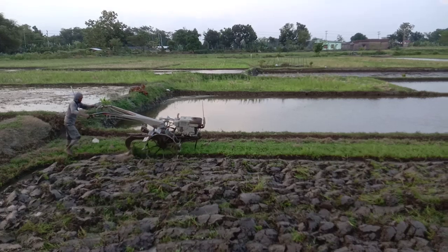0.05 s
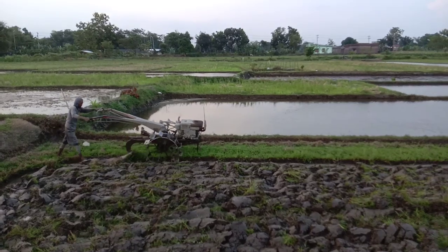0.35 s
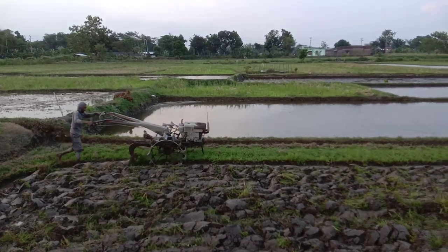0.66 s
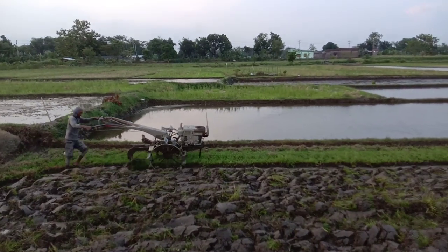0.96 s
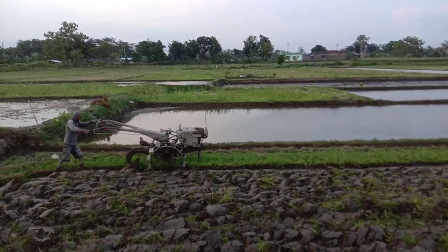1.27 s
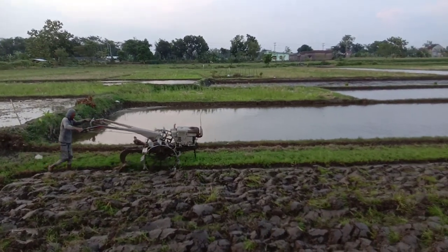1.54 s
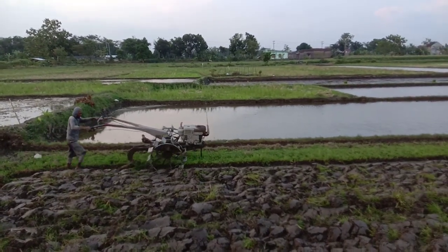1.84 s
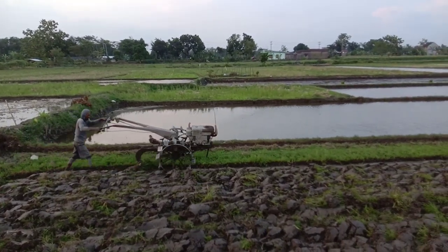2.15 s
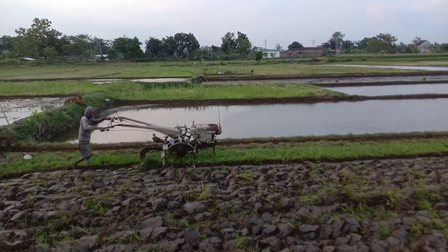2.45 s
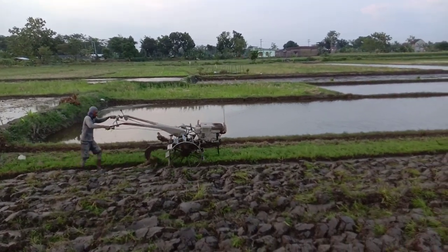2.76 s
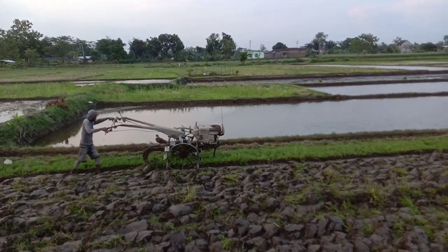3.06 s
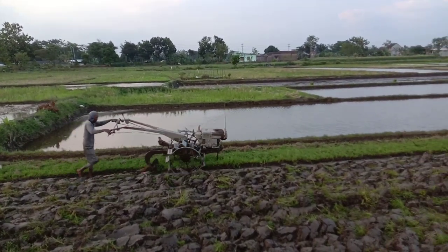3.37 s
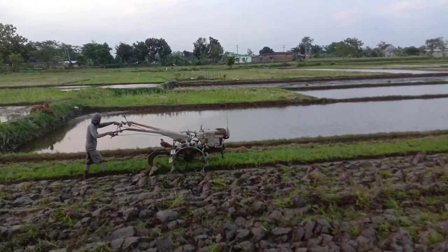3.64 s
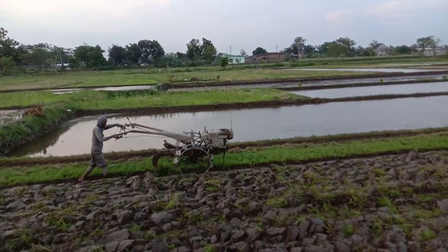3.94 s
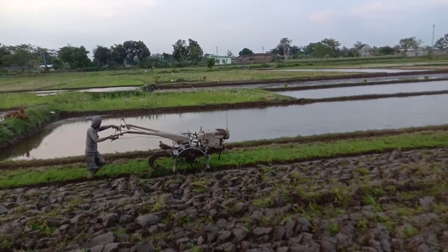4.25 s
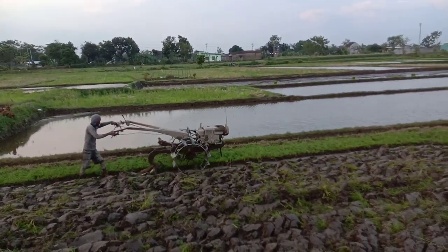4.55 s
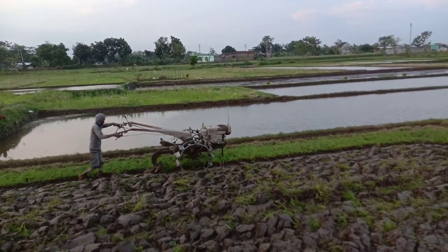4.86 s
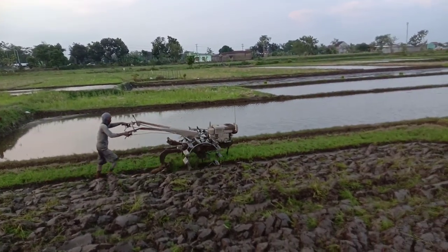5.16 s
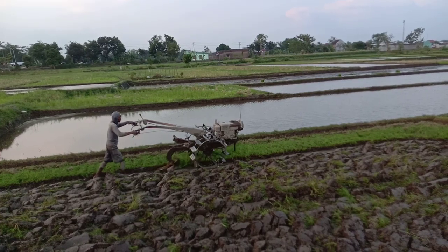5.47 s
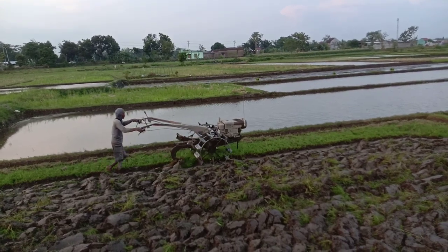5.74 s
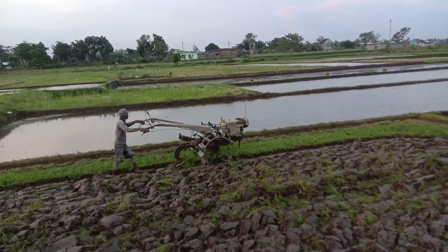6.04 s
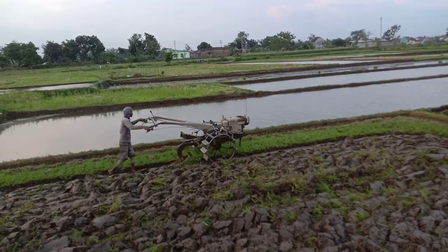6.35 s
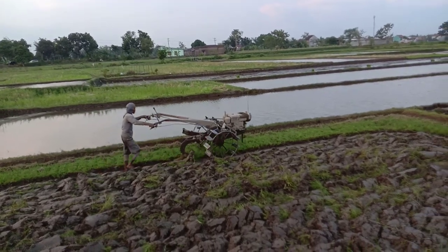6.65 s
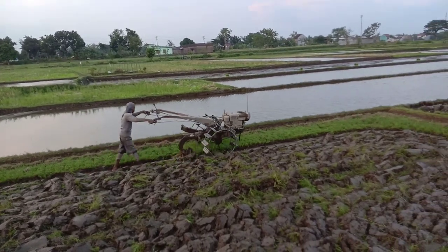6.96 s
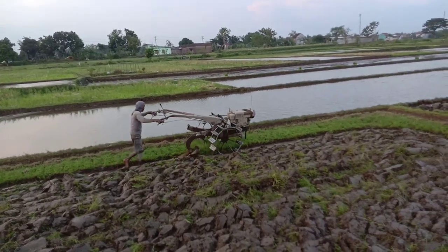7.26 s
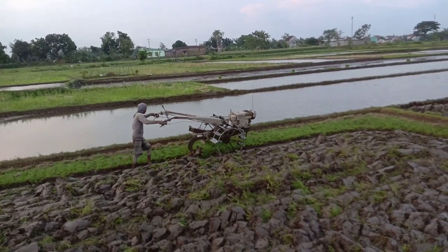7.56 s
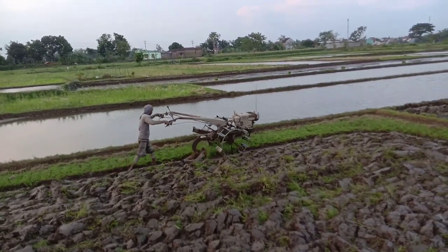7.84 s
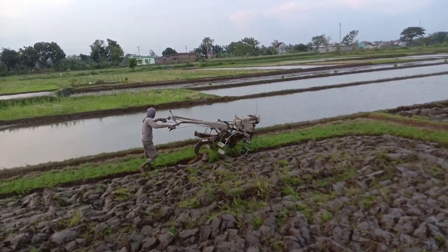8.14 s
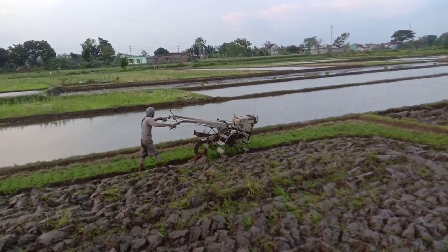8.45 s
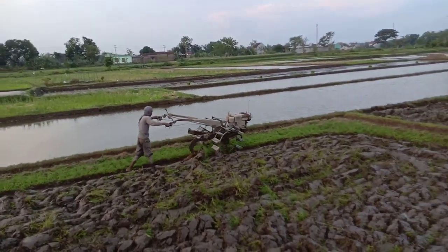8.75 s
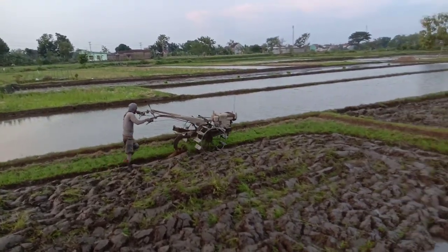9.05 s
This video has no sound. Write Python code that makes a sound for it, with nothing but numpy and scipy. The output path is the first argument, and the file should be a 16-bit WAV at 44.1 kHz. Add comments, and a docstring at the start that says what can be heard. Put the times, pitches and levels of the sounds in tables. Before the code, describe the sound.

A single-cylinder walking tractor chugs through an open field with rapid, uneven iron knocks, soft exhaust puffs and clattering gears. Loose plough fittings clink now and then, and a thin high hiss comes and goes. After about three seconds wind begins to buffet the microphone and keeps gusting, while the engine holds its pace and softens slightly as it moves away.

```python
"""A single-cylinder walking tractor ploughs past the microphone in a wet rice field and moves away.
It fires about 7.5 times a second: each firing knocks the iron block, often with a second slap, and every
other firing is weaker. A soft exhaust puff follows, gears clatter between, loose plough fittings clink.
After three seconds wind starts to buffet the microphone; a thin hiss comes and goes."""
import sys
import numpy as np
from scipy import signal
from scipy.fft import rfft, irfft, next_fast_len
from scipy.io import wavfile
from scipy.ndimage import uniform_filter1d, map_coordinates

SR = 44100
rng = np.random.default_rng(int(sys.argv[2]) if len(sys.argv) > 2 else 0)


def bounce(signal):
    """Save signal as a 16-bit WAV file at the path given by the first command-line argument."""
    frames = np.transpose(np.atleast_2d(signal))
    limited = np.clip(frames, -1, 1)
    pcm = np.round(limited * 32767).astype(np.int16)
    wavfile.write(sys.argv[1], SR, pcm)


N = 401310
TIME = np.arange(N) / SR
T = np.arange(SR // 6) / SR  # time within one blow

# spectrum of rattling and grinding metal: f/Hz, level/dB
METAL_SPECTRUM = [(150, -43), (210, -10.5), (300, -41), (400, -10.5), (540, -10.5), (630, -2), (730, -11.5),
                  (850, -5), (1080, -6), (1240, 0.5), (1420, -7.5), (1900, -14), (2300, -26.5),
                  (5000, -55.5)]


def amp(db):
    """Decibels to gain."""
    return 10 ** (np.asarray(db) / 20)


def unit(x):
    """Scale to rms 1."""
    return x / np.sqrt(np.mean(x ** 2) + 1e-20)


def curves(rows):
    """One value per sample for each column after the time."""
    times, *columns = np.transpose(rows)
    return [np.interp(TIME, times, column) for column in columns]


def bumps(rows):
    """A gain that rises and falls around each row of t/s, half length/s, level/dB."""
    return sum(amp(db) * np.exp(-((TIME - s) / half) ** 2) for s, half, db in rows)


def wobble(rate):
    """A smooth random curve, rate knots a second."""
    return map_coordinates(rng.standard_normal(int(N * rate / SR) + 4), [TIME * rate])


def burst(rise, t60):
    """An envelope that swells and dies away, top 1."""
    shape = (1 - np.exp(-(T / rise) ** 2)) * amp(-60 * T / t60)
    return shape / shape.max()


def filtered(x, response):
    """Filter x by a gain that depends on frequency."""
    size = next_fast_len(N + SR // 2)
    return irfft(rfft(x, size) * response(np.fft.rfftfreq(size, 1 / SR)), size)[:N]


def noise(spectrum, patchy_db=0, frame=512):
    """Noise of rms 1, shaped by rows of f/Hz, level/dB, with small patches of random gain."""
    f, level = np.transpose(spectrum)
    cells = signal.stft(rng.standard_normal(N), nperseg=frame)[2]
    patches = uniform_filter1d(rng.standard_normal(cells.shape), size=2, axis=0)
    patches = uniform_filter1d(patches, size=5, axis=1)
    patchy = signal.istft(cells * amp(patchy_db * unit(patches)), nperseg=frame)[1][:N]
    return unit(filtered(patchy, lambda hz: amp(np.interp(np.log(hz + 1), np.log(f), level))))


def add(track, s, sound):
    """Mix a sound into a track at time s."""
    start = max(round(s * SR), 0)
    part = track[start:start + len(sound)]
    part += sound[:len(part)]


def hiss(rest_db=-68.5):
    """A thin high hiss swells and fades in the background."""
    # swells: t/s, half length/s, level/dB
    swells = [(1.85, 0.46, -56), (3.1, 0.12, -53), (3.68, 0.42, -48), (5, 0.18, -48.5), (5.4, 0.2, -47),
              (6.35, 0.37, -58), (7.16, .06, -52)]
    # hiss spectrum: f/Hz, level/dB
    spectrum = [(3500, -45.5), (4700, 6), (5300, 10.5), (6100, 4), (6600, -12.5), (9000, -48)]
    return (amp(rest_db) + bumps(swells)) * noise(spectrum, patchy_db=2.5) * amp(1.6 * wobble(40))


def wind(ceiling=.28):
    """Light air rumbles on the microphone; stronger eddies buffet it, and hard gusts flutter higher."""
    # wind strength at the microphone: t/s, level/dB
    strength = [(2.2, -100), (2.6, -55.5), (3.2, -66), (3.26, -43.5), (3.61, -35.5), (3.7, -72),
                (3.78, -20), (4.2, -37), (4.33, -23), (5.38, -25), (5.5, -35), (5.57, -22.5), (5.9, -30),
                (6.19, -26), (6.25, -83), (6.28, -28.5), (6.98, -26), (7.07, -36), (7.42, -19),
                (8.3, -30.5), (8.65, -24.5), (9.1, -26)]
    # flutter of the hard gusts: t/s, half length/s, level/dB
    gusts = [(3.902, 0.051, -32.5), (4.52, 0.12, -33.5), (5.29, 0.038, -31.5), (5.59, 0.034, -35),
             (6.335, 0.043, -24), (6.528, 0.061, -22.5), (7.6, 0.22, -35)]
    # spectra of light air, eddies and gusts: f/Hz, level/dB
    rumble_spectrum = [(20, -28.5), (40, -29), (60, -12), (85, -0.5), (130, 2.5), (200, -7), (400, -34.5),
                       (1500, -79.5)]
    buffet_spectrum = [(20, -36), (45, -30), (65, -13), (85, -4), (115, .5), (165, 1.5), (260, -2.5),
                       (330, -7.5), (420, -13), (600, -24), (1500, -50), (4000, -80)]
    flutter_spectrum = [(150, -53.5), (300, 0.5), (400, -1.5), (600, -7.5), (900, -21.5), (1500, -28),
                        (4000, -82)]
    strength_db, = curves(strength)
    rumble = amp(np.minimum(0.78 * strength_db - 3.5, -32)) * noise(rumble_spectrum)
    buffet = amp(strength_db) * noise(buffet_spectrum, patchy_db=3, frame=2048)
    turbulence = amp(2 * wobble(24))
    flutter_gain = amp(1.23 * strength_db - 13.5) + bumps(gusts)
    flutter = flutter_gain * noise(flutter_spectrum, patchy_db=3, frame=1024)
    air = turbulence * (rumble + buffet + flutter)
    return air / (1 + (air / ceiling) ** 4) ** .25  # the strongest pushes are rounded off


def firing_times(first_s=.018):
    """The engine fires each time it completes a cycle."""
    # speed held by the governor from each time on: t/s, firing rate/Hz
    speed = [(0, 7.413), (1.37, 7.475), (3.24, 7.389), (3.65, 7.584), (4.57, 7.528), (6.16, 7.49),
             (6.7, 7.407), (8.32, 7.457)]
    times, rate = np.transpose(speed)
    cycles = np.cumsum(rate[np.searchsorted(times, TIME, side="right") - 1]) / SR
    return first_s + np.interp(np.arange(int(cycles[-1]) + 1), cycles, TIME)


def cover_ring(detune=0.019):
    """Thin covers and tank jangle, tuned a little differently at each blow."""
    # sheet-metal modes: f/Hz, t60/s, level/dB
    cover_modes = [(2150, 0.1, -7), (2500, 0.085, 1.5), (2720, 0.14, -2.5), (3103, 0.14, -7),
                   (3695, 0.094, -3), (3980, 0.052, 8), (4390, 0.051, 3.5)]
    hz, t60, level = np.transpose(cover_modes)[:, :, None]
    pitch, phase = rng.standard_normal((2, len(cover_modes), 1))
    modes = amp(level - 60 * T / t60) * np.sin(2 * np.pi * (hz * (1 + detune * pitch) * T + phase))
    ring = modes.sum(0) * (1 - np.exp(-T / 0.0021))
    return ring / np.sqrt(np.sum(ring ** 2) / (.01 * SR))  # the energy of 10 ms at rms 1


def block_ring(behind, rise, scatter_db=1.1, detune=0.012):
    """The struck iron block rings, heard from the side (behind=0) round to the rear (behind=1)."""
    # block modes: f/Hz, t60/s, side level/dB, rear level/dB
    block_modes = [(607, 0.014, -33.5, -10.5), (841, 0.064, -14.5, -4.5), (1035, 0.044, -7.5, -19.5),
                   (1206.6, 0.1, -10.5, -5), (1244.4, 0.05, 3, -5.5), (1284.5, 0.068, -8, -2),
                   (1480, 0.015, 4, -5), (1597, 0.12, -14.5, -25.5), (1924, 0.065, -15, -36.5)]
    hz, t60, side_db, rear_db = np.transpose(block_modes)[:, :, None]
    size, pitch, phase = rng.standard_normal((3, len(block_modes), 1))
    level = side_db + behind * (rear_db - side_db) + scatter_db * size
    modes = amp(level - 60 * T / t60) * np.sin(2 * np.pi * hz * (1 + detune * pitch) * T + 0.97 * phase)
    ring = modes.sum(0) * (1 - np.exp(-(T / rise) ** 2))
    return ring / np.sqrt(np.mean(ring[T < .012] ** 2))  # rms 1 over the first 12 ms


def clinks():
    """Loose plough fittings chink or clank; the broader clanks ring the block more."""
    # strikes: t/s, f/Hz, level/dB, spread of the partials/octaves
    strikes = [(.211, 6300, -48, 0.022), (1.459, 4330, -36, 0.35), (1.648, 3980, -33.5, 0.34),
               (1.699, 4800, -38.5, 0.4), (2.892, 3790, -31, 0.19), (2.902, 5200, -37.5, 0.25),
               (5.181, 5980, -43, 0.034), (5.764, 6270, -44, 0.034), (6.728, 4380, -41, 0.19),
               (6.955, 3860, -37, 0.059), (8.787, 4600, -39.5, 0.28), (8.934, 4880, -39.5, 0.24),
               (9.013, 5730, -44, 0.12)]
    out = np.zeros(N)
    for s, hz, db, spread in strikes:
        pitch, phase = rng.standard_normal((2, 80, 1))
        partials = hz * 2 ** (spread * pitch)
        cluster = (np.sin(2 * np.pi * (partials * T + phase)) * hz / partials).sum(0)
        fitting = burst(0.0018, 0.11) * unit(cluster)
        add(out, s, amp(db - 0.5) * (fitting + 4 * spread * block_ring(0, rise=0.014)))
    return out


def exhaust(puff_hz=88, width_s=0.01, lag_s=0.0497, puff_db=-36.5, tail_db=-46):
    """The muffler lets out one round puff after each firing, with a low flutter behind it."""
    # flutter spectrum: f/Hz, level/dB
    tail_spectrum = [(30, -32), (70, -2), (125, 2), (165, -4.5), (220, -6), (320, -19), (1000, -50)]
    puffs, tail = np.zeros((2, N))
    for s in firing_times():
        slip, size = rng.uniform(-0.9, 1, 2)
        from_peak = T - lag_s - 0.0012 * slip
        puff = np.exp(-(from_peak / width_s) ** 2) * np.cos(2 * np.pi * puff_hz * from_peak + 0.36)
        add(puffs, s, amp(puff_db + 2 * size) * puff)
        add(tail, s + lag_s, amp(tail_db) * burst(.008, 0.37))
    return puffs + tail * noise(tail_spectrum)


def clatter(fade_db=1.5):
    """Valves and transmission tick over a grind that sinks between firings; a high rasp lies above."""
    # t/s, clatter level/dB, level of the steady high rasp/dB
    levels = [(0.0, -38, -50.5), (0.61, -39, -50.5), (1.82, -35, -48.5), (2.48, -39, -50.5),
              (3.01, -36.5, -46.5), (4.6, -38.5, -51.5), (5.4, -39, -49), (6.18, -38, -53),
              (6.69, -38.5, -52), (8.64, -40.5, -52.5), (9.1, -36.5, -48.5)]
    # steady high rasp, coloured by the microphone near 4.3 and 9.3 kHz: f/Hz, level/dB
    high_rasp_colour = [(1500, -25.5), (2400, -4), (3300, -5.5), (3900, 1.5), (4350, 6), (4750, -3),
                        (6100, -5.5), (6600, -18), (7000, -17.5), (8200, -22), (9350, -8), (10300, -23),
                        (12000, -37.5), (13700, -40), (15500, -22)]
    clatter_db, rasp_db = curves(levels)
    contacts = np.zeros(N)
    firings = firing_times()
    for s in firings:
        for lag in (.066, .078, .097, .115):  # the valves move at the same points of every cycle
            slip, size = rng.standard_normal(2)
            contact_db = 3 * size - 55 * lag
            add(contacts, s + lag + 0.0034 * slip, amp(contact_db - 13) * cover_ring())
            add(contacts, s + lag + 0.002974 * slip, amp(contact_db - 0.7) * block_ring(0.51, 0.00055))
    cycle = np.interp(TIME, firings, np.arange(len(firings))) % 1
    settling = amp(fade_db * (.5 - cycle - cycle ** 6))  # quietest in compression, just before the knock
    grind = noise(METAL_SPECTRUM, patchy_db=3, frame=1024) * amp(1.85 * wobble(120))
    high_rasp = amp(rasp_db + 0.6) * noise(high_rasp_colour, patchy_db=3) * amp(0.86 * wobble(80))
    return amp(clatter_db + 0.33) * (settling * grind + contacts) + np.sqrt(settling) * high_rasp


def knocks(turn_start_s=2.85, turn_s=5.75, slap_lag_s=.0325, slap_swing_db=10.5, uneven_db=1.5):
    """Combustion knock and second slap: ringing iron, a bright crack and a rattle of loose metal."""
    # engine effort: t/s, full knock level/dB, limp/dB (above 0 odd firings weaken, below 0 even ones)
    effort = [(0, -18, 4.5), (.65, -18.5, 2.5), (.98, -22, 6.5), (1.5, -20, 7.5), (1.77, -19, -1),
              (2.04, -21, 0), (2.68, -20.5, 9), (2.86, -28, 2.5), (3.25, -20, 6.5), (3.62, -19, 1.5),
              (3.87, -28.5, -0.5), (4.15, -23, 12), (5.5, -20.5, 7), (5.95, -20, -0.5), (6.55, -22.5, 10),
              (6.97, -19.5, 5.5), (7.4, -24, 5.5), (8.2, -25, 6), (9, -26, -5.5)]
    # spectrum of the crack: f/Hz, level/dB
    crack_spectrum = [(900, -2.5), (2000, 3.5), (2750, 1.5), (3200, -2.5), (4000, 4), (4400, 2),
                      (4900, -4.5), (6200, -4.5), (7100, -11), (8300, -22.5), (12500, -39.5), (14200, -32),
                      (15200, -11), (15800, -30)]
    # highest tingle on the knocks: t/s, level/dB
    tingle_levels = [(0, -81.5), (2.5, -66), (3.9, -52), (4.5, -67), (9.1, -75.5)]
    ring, crack, rattle, shaken = np.zeros((4, N))
    times, full_db, limp_db = np.transpose(effort)
    for k, s in enumerate(firing_times()):
        slip, size, slap_size, rattle_size = rng.uniform(-0.85, 1, 4)
        behind = np.clip((s - turn_start_s) / turn_s, 0, 1)  # the tractor's rear turns to the microphone
        lead_db = (-1) ** k * np.interp(s, times, limp_db)  # over the other firing of the pair
        weak_db = max(-lead_db, 0)

        knock_db = np.interp(s, times, full_db) - weak_db + uneven_db * size
        crack_db = -40.5 - 4.5 * behind - 0.62 * weak_db + uneven_db * size
        rattle_db = -30 - 3 * behind - 0.63 * weak_db + 3 * rattle_size
        add(ring, s - .0006, amp(knock_db - 2.2) * block_ring(behind, rise=0.0022))
        add(ring, s - .0006, amp(crack_db) * cover_ring())
        add(crack, s - .0005, amp(crack_db - 1.5) * burst(0.00087, 0.2))
        add(crack, s - .0005, amp(crack_db - 7) * burst(0.00042, 0.093))
        add(rattle, s + 0.0036, amp(rattle_db) * burst(0.0033, 0.16))
        add(shaken, s, amp(-0.62 * weak_db) * burst(.004, .3))

        # the limp swings the slap up on the full firing, down on the weak one
        slap_db = knock_db - 12 + slap_swing_db * np.tanh(lead_db / 4) + slap_size
        slap_s = s + slap_lag_s + .001 * slip
        add(ring, slap_s, amp(slap_db - 5) * block_ring(behind, rise=0.0016))
        add(ring, slap_s, amp(.5 * slap_db - 41.5) * cover_ring())
        add(crack, slap_s, amp(.5 * slap_db - 32) * burst(0.00063, 0.39))
    tingle = amp(curves(tingle_levels)[0] + 5.5 * wobble(260)) * shaken
    # fill the three envelopes with noise
    tingle *= noise([(13000, -32), (14500, -6), (15200, 5.5), (15800, -11)])
    crack *= noise(crack_spectrum, patchy_db=5.5) * amp(1.2 * wobble(500))
    rattle *= noise(METAL_SPECTRUM, patchy_db=1.5)
    return ring + crack + rattle + tingle


def scene():
    """Tractor, hiss and wind at one microphone in the open field."""
    return (knocks() + clatter() + exhaust() + clinks() + hiss() + wind())[None]


def record(dry, top_hz=15800):
    """The microphone chain passes nothing above its band limit."""
    return filtered(dry[0], lambda hz: hz < top_hz)[None]


dry = scene()
out = record(dry)
bounce(out)
```